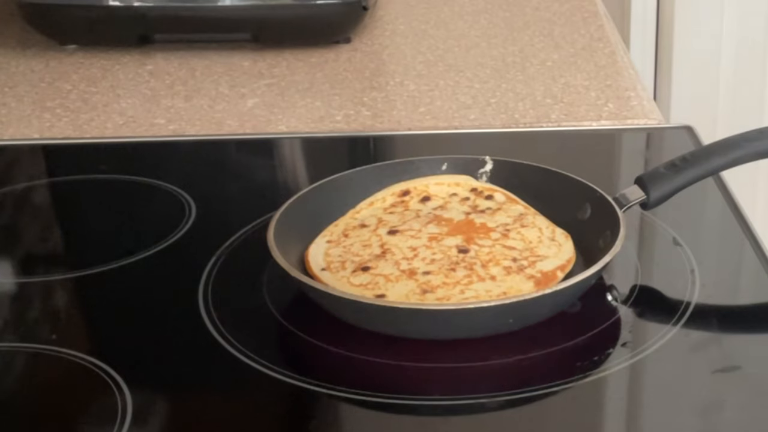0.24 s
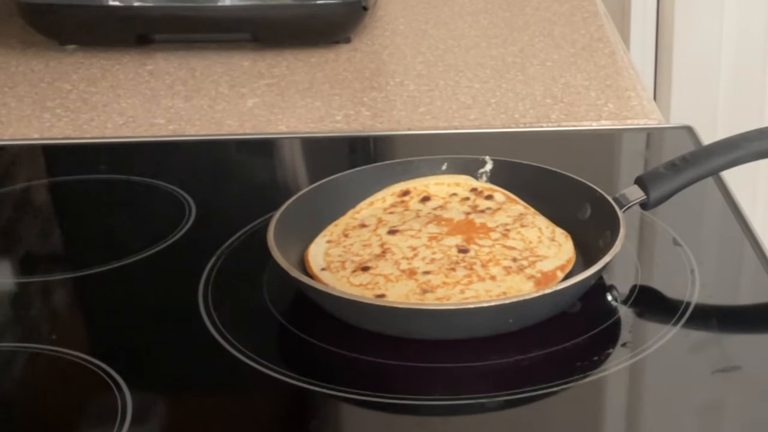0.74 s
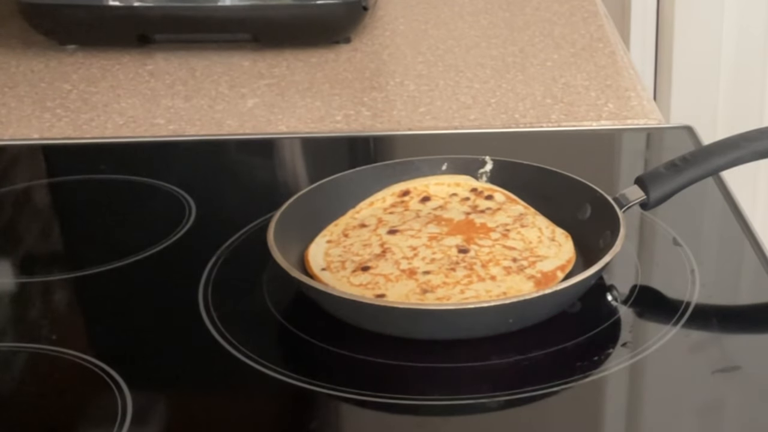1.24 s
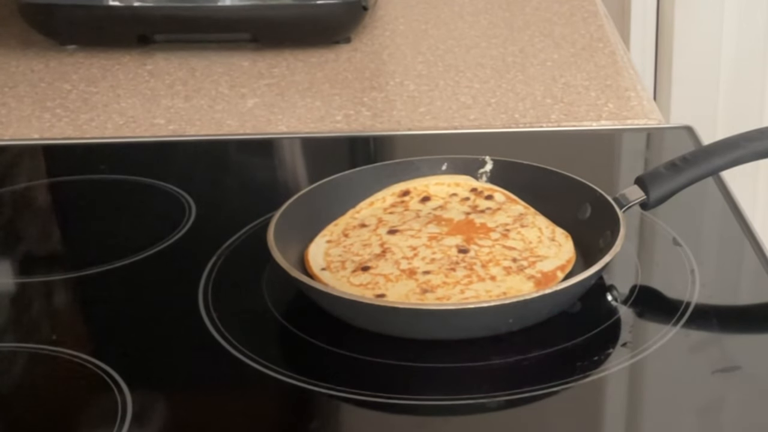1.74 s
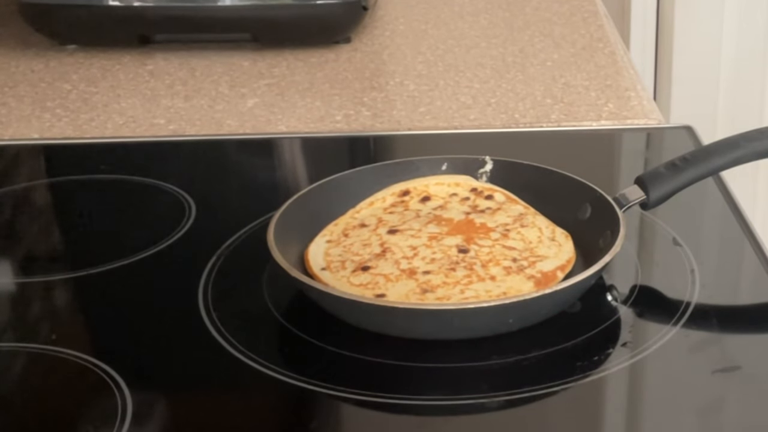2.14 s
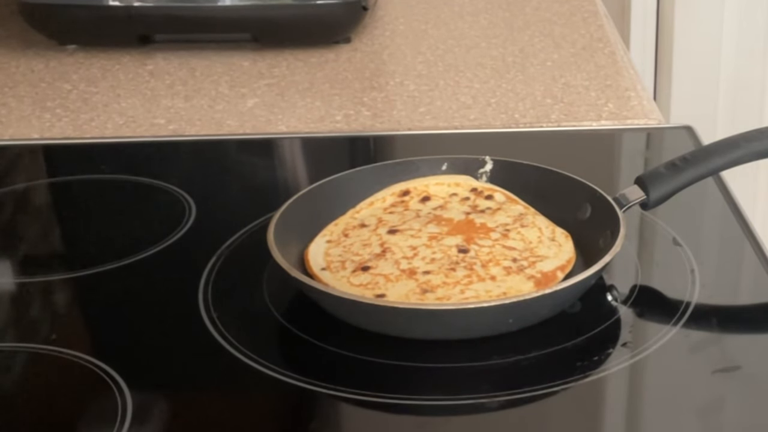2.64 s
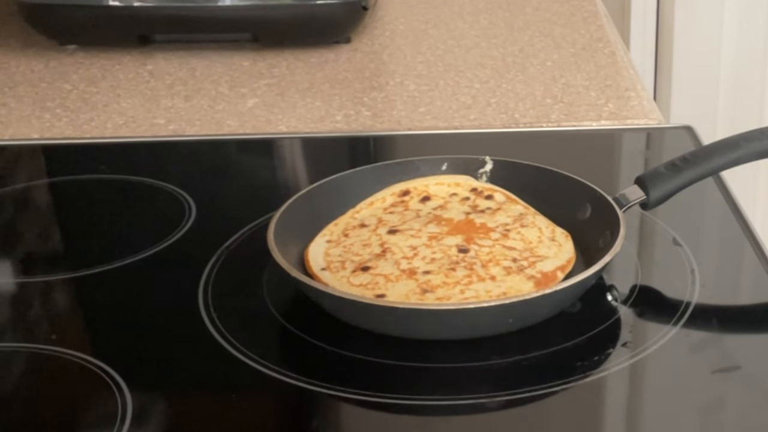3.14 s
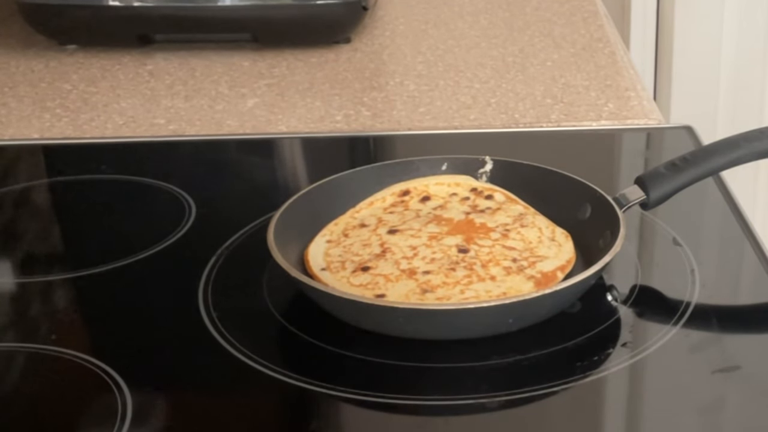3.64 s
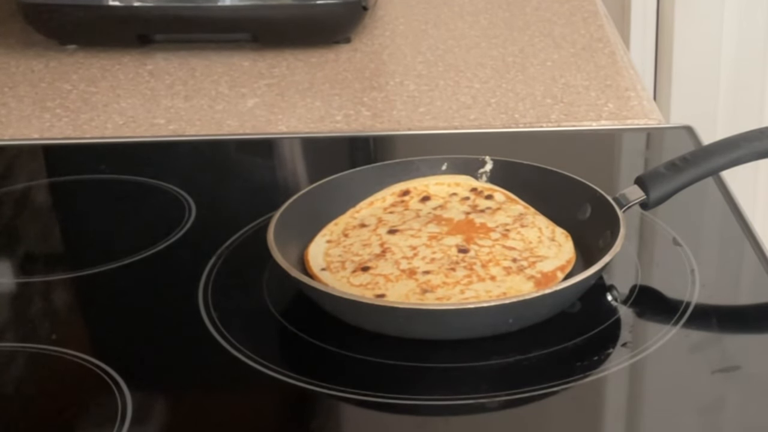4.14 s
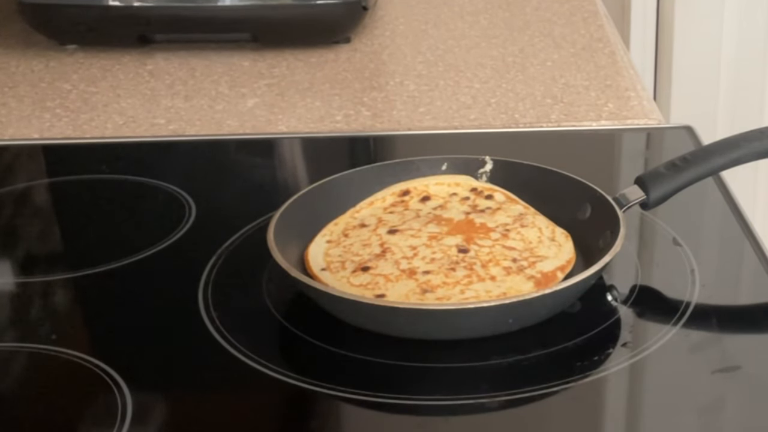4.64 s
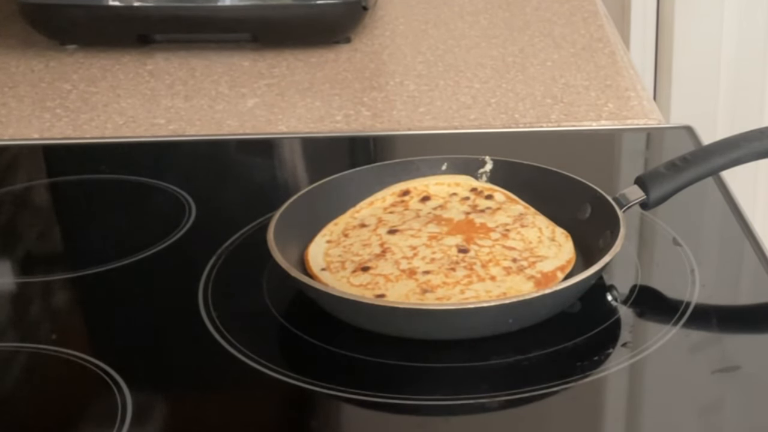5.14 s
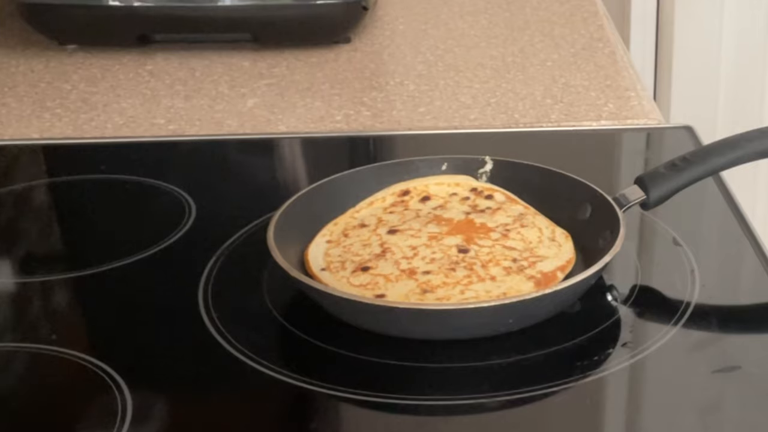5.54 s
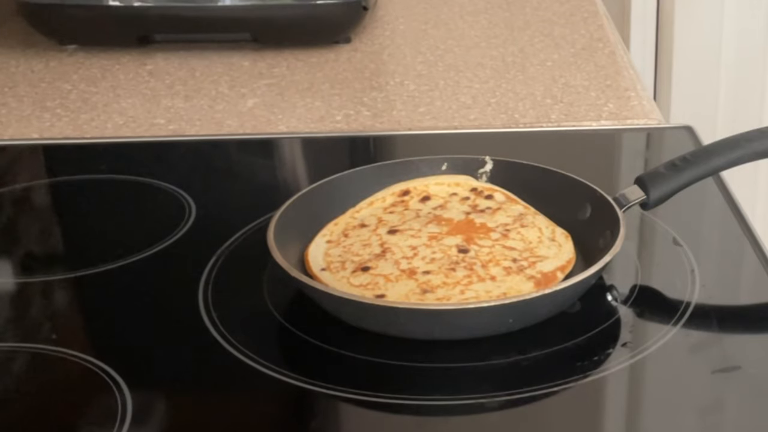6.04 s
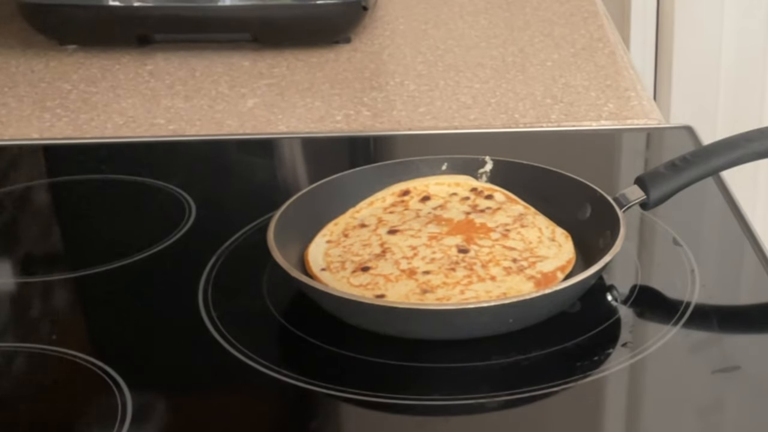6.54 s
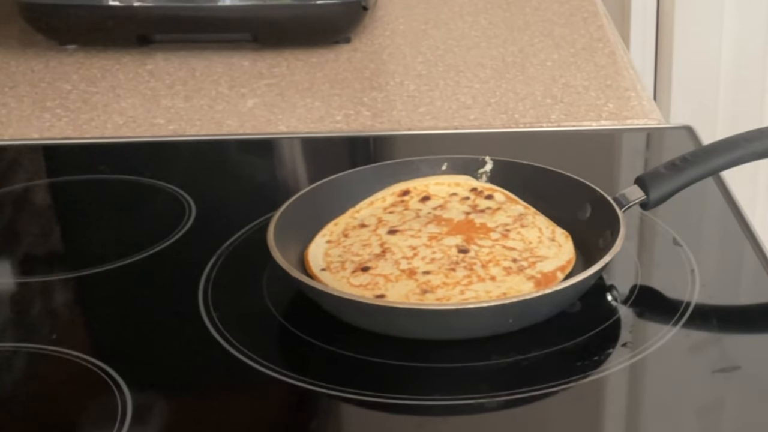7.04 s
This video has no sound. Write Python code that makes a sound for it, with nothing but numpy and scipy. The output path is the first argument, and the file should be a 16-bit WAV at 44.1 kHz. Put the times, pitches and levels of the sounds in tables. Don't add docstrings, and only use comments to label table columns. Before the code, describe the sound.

Off to one side in a kitchen, drawers scrape and knock, utensils clatter, and a cupboard slams hard over faint appliance hum.

```python
import sys
import numpy as np
from scipy import signal
from scipy.fft import rfft, irfft, next_fast_len
from scipy.io import wavfile
from scipy.ndimage import uniform_filter1d

SR = 44100
rng = np.random.default_rng(int(sys.argv[2]) if len(sys.argv) > 2 else 0)


def bounce(signal):
    frames = np.transpose(np.atleast_2d(signal))
    limited = np.clip(frames, -1, 1)
    pcm = np.round(limited * 32767).astype(np.int16)
    wavfile.write(sys.argv[1], SR, pcm)


def magnitude_from_level(level_db):
    exponent = np.asarray(level_db, float) / 20
    return 10 ** exponent


N = 321797

# frequency in Hz, density in dB per Hz.
HUSH_SPECTRUM = [(30, -2), (55, -8.5), (85, -4), (120, 6), (170, -16), (240, -13.5), (340, -10.5),
                 (700, -18.5), (1300, -26), (2500, -30.5), (5000, -37.5), (8000, -34.5), (11000, -36.5),
                 (15500, -46)]
HUSH_DB = -53.5
# times in seconds, gain of the air above 6 kHz in dB.
TREBLE_AIR = [.8, 2.4, 4, 8], [3, 1.8, -6.5, -3.5]
# frequency in Hz, likeness from 0 to 1.
PORT_LIKENESS = [(60, .96), (170, .6), (500, .15), (900, .2), (6300, .3), (7300, .7), (8000, .99),
                 (16000, 1)]
# frequency in Hz, T60 in seconds.
ROOM_T60 = [(60, 0.73), (250, 0.61), (1000, 0.56), (4000, 0.53), (8000, 0.49), (12000, 0.55)]
# frequency in Hz, level in dB.
ROOM_COLOUR = [(150, 9), (230, -10), (340, 4.5), (500, -1.5), (700, 1), (1000, -4), (1280, 0), (1600, 0),
               (2200, 0.5), (2750, 1), (3300, -2), (5000, 2), (7500, -3), (11000, -2.5), (15000, -22)]
PORT_LAG = 10.79
BASS_LAG = 12
RING_TURN = 1.4

# start in seconds, level in dB, deep boom in dB relative to the panel.
SIDE_WALL = (107, 0.33), [(.562, -44, -15), (.69, -42, -8), (.901, -46.5, -7), (1.161, -35, -8.5),
             (1.562, -26.5, -24.5), (1.598, -25, -10), (1.861, -21.5, -7.5), (3.234, -50, -15),
             (4.015, -46.5, -31), (4.323, -36, -16), (4.691, -41, -11), (7.174, -30, 4),
             (7.249, -17.5, -16)]
FRONT = (109, 0.23), [(5.455, -38, -13), (6.243, -44, -3), (6.689, -36, -8), (6.92, -39.5, -13),
         (6.954, -38, -3.5), (7.119, -34.5, -5), (7.217, -11.5, -2), (7.275, -21.5, -5.5)]
BOTTOM = (109, 0.24), [(1.04, -22, -20), (1.056, -23, -20), (.399, -44.5, -9), (2.899, -40, -21),
          (4.502, -47, -23), (5.231, -63, -20), (5.387, -46, -26.5), (5.827, -47, -16)]
SHELF = (142, 0.44), [(.009, -35.5, -0.5), (.098, -45, -12), (6.645, -44, -2)]
FLOOR = (78, 0.5), [(1.866, -27.5, -5), (2.3, -57, 6.5)]

PARTS_HZ = [850, 300, 2600, 6500, 12500]
# loudest moment in seconds, level in dB, swell in seconds, fade in seconds, hardness from 0 to 1.
DRAGS = [(0.043, -21, 0.1, 0.11, 0.45), (.382, -46.5, 0.087, 0.026, 0.5), (.8, -65, .02, 0.11, 0.8),
         (.62, -54, 0.11, 0.099, .1), (.85, -66, 0.076, 0.13, 0), (4.93, -45.5, 0.22, 0.068, 0.4),
         (.6, -64, 0.056, 0.61, 0.6), (1.0, -49, 0.84, 0.022, 0.71), (1.027, -26, 0.014, 0.0058, 0.52),
         (1.551, -39.5, 0.01, 0.11, 0.99), (1.612, -35.5, 0.33, 0.67, 0.61),
         (1.76, -45.5, 0.24, 0.052, 0.93), (1.851, -28.5, 0.034, 0.01, 0.2),
         (2.888, -35, 0.043, 0.094, 0.72), (3.27, -48.5, 0.49, 0.4, 0.8), (4.05, -53, 0.52, 0.045, 0.72),
         (2.25, -72.5, 0.18, 0.61, 0.94), (4.399, -53.5, 0.42, 0.058, 0.85),
         (4.47, -32, 0.044, 0.029, 0.86), (4.654, -38.5, 0.075, 0.015, 1), (5.37, -42.5, 0.041, 0.19, 0),
         (5.5, -49, 0.074, 0.23, 1), (5.9, -49.5, 0.29, 0.73, 0.67), (6.239, -40.5, 0.52, 0.2, 0.88),
         (6.64, -58, .15, 0.42, 0.1), (6.942, -44, 0.074, 0.2, 0.8), (7.0, -36.5, 0.17, 0.29, 0.73),
         (7.22, -37, 0.053, 0.014, 1)]
SWELL_DB = 20
# carcass, clack and tick in dB relative to the knock.
SOFT_DB = (-5, -36.5, -39)
HARD_DB = (-10.5, 5, -2)
# start in seconds, knock level in dB, contact in milliseconds.
THUDS = (4.6, -16, -18.5), [(1.558, -38, 20), (1.603, -30, 4.1), (2.887, -49.5, 12), (3.439, -57, 9.4),
         (3.551, -55.5, 13), (5.214, -60, 12), (5.351, -59.5, 8), (6.585, -51.5, 28), (6.62, -47, 54),
         (6.66, -50.5, 28), (7.131, -37, 97), (7.212, -28, 16)]
RAPS = (-7.5, -12.5, -40), [(1.48, -34, 45), (3.355, -43, 8.3), (3.713, -48, 41), (4.046, -49.5, 9),
        (4.199, -44.5, 20), (4.69, -44, 41), (5.458, -38.5, 11), (6.089, -34.5, 15), (6.155, -36.5, 8.8),
        (6.177, -37, 13), (6.216, -33.5, 18), (6.25, -37.5, 31), (6.3, -42, 19), (6.826, -61.5, 11),
        (6.927, -37, 3.7)]
CLACKS = (-10, -8.5, -19.5), [(1.186, -35, 10), (1.196, -26.5, 25), (3.222, -45, 6), (3.236, -35, 25),
          (4.489, -30, 19), (5.42, -37, 23), (5.649, -46.5, 25), (5.901, -28.5, 14.8), (5.94, -43.5, 8.9),
          (6.893, -42.5, 18), (6.959, -52, 7.8)]
TICKS = (1.05, -2.6, -7), [(.36, -51, 33), (1.032, -37.5, 11.5), (2.46, -51.5, 3.7), (2.8, -52, 8.9),
         (3.1, -59.5, 11), (3.842, -57.5, 6), (3.988, -48.5, 27), (4.302, -43.5, 29), (4.402, -36.5, 14),
         (5.511, -48, 19)]
CRASHES = (-1.2, -3, -27), [(1.862, -17, 24.14)]
CHINKS = (-14.5, 1.3, -2.8), [(2.8, -52.5, 15), (4.477, -54.5, 9.1), (4.652, -24, 36), (4.593, -50, 8.7),
          (4.628, -54, 6.9), (5.162, -68, 4.8), (5.52, -50.5, 28), (6.958, -36.5, 13), (7.2, -29.5, 26)]

# mode frequency in Hz, level in dB, T60 in seconds.
DOOR = [(258.7, -0.5, 0.44), (323, -6.5, 0.22), (406, -4, 0.34), (482, 9, 0.066), (765, -11, 0.15),
        (842, -8.5, 0.19), (1058, 13, 0.12), (1097, 1, 0.25), (1143, -7.5, 0.31), (1387, -3.5, .3),
        (1533, -8, 0.25), (2156, -18.5, 0.34), (3220, -17.5, .25), (3730, -19.5, .3)]
HINGE = [(2050, -4, .15), (4480, -2, .2), (6070, -5, .2), (6200, -6, .15), (7850, -5, .25), (8050, -6, .15),
         (9700, -2, .1), (10100, -3, .1), (10810, -4, .2), (11140, -8, .2), (12100, -7, .15),
         (12400, -7, .2)]
LATCH = [(3280, -0.5, 0.017), (3888, -4, 0.044), (4290, -2.5, 0.025), (5490, -8, .03), (4815, -2.5, 0.013),
         (4550, 2.5, 0.039)]
LINER = [(318, 0, 0.115), (394.5, -1.5, .12), (470, -5, 0.08)]
BOX = [(415, -3.5, .05), (545, -2, .06), (850, 0.5, .08), (996, -3.5, .06), (1420, -12.5, 0.052)]
TRAY = [(499, -6, 0.011), (671, 0, 0.015), (769.4, -5.5, 0.056)]
LADLE = [(1384, -18, .35), (2098, -17, .35), (2142, -11, .3), (2186, 0, .36), (2200, -8, .75),
         (2649, -17, .65), (3262, -25, .35), (4490, -26, .4), (4727, -18, .65), (5744, -22, .3),
         (8118, -24, .2), (8430, -15, .15), (11440, -26, .2), (12180, -25, .2)]
TONGS = [(1227, 8, 0.14), (1910, -1, 0.37), (3340, -5.5, 0.24), (5560, -5, .12), (8540, -17, .2)]
SPOON = [(960, -2.5, .25), (1340, -6, .25), (2190, 0, .3), (2720, -7, .55), (3400, -9, .2),
         (4910, -18, .12)]
FORK = [(3330, 0, .15), (3345, -7, .6), (3420, -8, .2), (5620, -12, .15)]
GLASS = [(3235, 12, 3.5), (8200, 8, .3), (8850, 3, .12)]
CUP = [(490, -5.5, 0.11), (529, 1.5, 0.1), (798, 1.5, 0.063), (1423, -9, 0.54), (1796, 4.5, 0.26),
       (2500, -14, 0.31), (2830, -27, 0.32), (3080, -26, .25), (4240, -24, 0.32), (7477, -47.5, 0.18),
       (9560, -24, .15)]
PAN = [(511, 10.5, 0.038), (636, -4, 0.037), (1720, -9, .08), (1990, -3.5, 0.11), (2880, -12.5, 0.073),
       (3079, -4.5, .07), (4300, -16, 0.051), (5160, -31, 0.15), (7800, -19.5, .08)]
SCOOP = [(2600, -6, .05), (3690, -6, .1), (3775, -6, .12), (3854, 2, .5), (6072, -14, .3), (9469, -16, .2),
         (9800, -16, .1), (10500, -15, .12)]
CUTLERY = [(1755, -0.5, 0.8), (2220, -10, 0.39), (2850, -11, 0.4), (3600, -6, 0.16), (3890, 1, 0.21),
           (4760, 0, 0.26), (4910, -3.5, .25), (5970, 1, 0.27), (7340, -6, 0.17), (7580, -1, 0.2),
           (8030, -5.5, .25), (8300, -7, .3), (9580, -7, 0.33), (11740, -8, 0.24)]
WHISK = [(2330, 0, .3), (3600, -12, .06), (5600, -8, .05), (13700, -8, .15)]
KEYS = [(10900, -3.5, 0.09), (11650, -5, 0.1), (12760, -1.5, .1), (13050, -3, .08), (13300, 2.5, 0.13),
        (13480, -0.5, .1), (13650, -1.5, .15), (14460, 1.5, .1), (14150, -1.5, .1), (14300, -4.5, .1),
        (15640, -5, .08), (15210, -4.5, 0.1205), (15600, -6, .08)]
# start in seconds, level in dB, contact in milliseconds.
HITS = [(LINER, [(.57, -51, 30), (.79, -49.5, 30), (.88, -51, 35), (.95, -49, 25), (7.212, -26, 13.5)]),
        ([(193.7, -0.5, .16), (150.2, -4.5, .1)], [(1.864, -23, 6), (6.64, -39, 25)]), ([(525, 4, .07),
        (613, -2.5, .07)], [(1.57, -38.5, 25), (1.61, -34, 12)]), (BOX, [(5.903, -34, 4.8),
        (5.938, -43.5, 4.5), (6.091, -34, 4), (4.8, -41, 4.5), (6.609, -46.5, 4.5), (5.455, -43, 6),
        (1.8605, -23.5, .8)]), (GLASS, [(.0, -65.5, 1)]), (HINGE, [(1.69, -44.5, 24.9)]),
        (DOOR, [(1.86, -18.5, 1.8)]), (LATCH, [(1.848, -36.5, 8.5), (1.859, -18, 0.92)]), ([(3900, -1, .04),
        (4160, -1, .04), (4620, -5, .04)], [(3.098, -57.5, 20)]), ([(1070, 7.5, .3), (796, 2.8, 0.27)],
        [(0., -38.5, 12)]), (FORK, [(1.189, -40.5, 3.3), (1.47, -60, 26), (6.36, -60.5, 60),
        (6.45, -62, 60), (7.022, -44, 6.9)]), (TONGS, [(6.2, -46, 25)]), (CUTLERY, [(2.803, -53, 14),
        (2.905, -73, 10), (3.1, -64, 8.2), (3.236, -53, 3.7)]), (PAN, [(4.408, -34, 15), (4.455, -41, 13)]),
        (CUP, [(4.486, -28, 4.6), (4.611, -65, 5.7)]), (KEYS, [(4.472, -48, 26), (4.65, -56, 16),
        (5.512, -54, 22), (1.7, -66, 40), (2.803, -61, 15), (6.955, -58, 20)]), (SCOOP, [(4.65, -30, 1.7)]),
        (LADLE, [(4.665, -19, 3.1)]), (WHISK, [(5.545, -56, 20), (5.6, -55, 33)]),
        (SPOON, [(6.478, -56, 22), (6.53, -66.5, 13)]), ([(263, 1, 0.14), (326.6, -2, 0.096)],
        [(7.216, -19, 7.2)])]
# start in seconds, level in dB, contact in milliseconds.
TRAY_HITS = [(2.815, -39, 42), (2.875, -36.5, 45), (3.09, -47.5, 37), (3.24, -69, 24), (3.345, -32.5, 17),
             (3.44, -44.5, 7.7), (3.55, -42, 6.5), (3.84, -48.5, 12), (4.035, -36.5, 29), (4.195, -35, 20),
             (4.685, -23, 21), (4.785, -31, 24), (5.902, -55, 5.7), (6.09, -42, 14), (7.055, -41.5, 25),
             (6.925, -40, 11), (1.68, -33, 25), (4.9, -43, 22), (3.19, -50, 22), (3.62, -52.5, 27)]
# start in seconds, level in dB, contact in milliseconds.
GLINTS = [(1.7, -52, 25), (1.859, -38, 5), (2.803, -56.5, 15), (4.472, -38, 25), (4.648, -42, 20),
          (5.512, -53, 22), (6.955, -57, 15), (7.2, -52.5, 20)]
# start in seconds, level in dB, top of the blow in Hz.
SLAMS = [
    (-.025, 12, 1747),
    (1.8598, 22.5, 1624),
]


def on_log(table, hz):
    table = np.array(table)
    return np.interp(np.log(hz + 1), np.log(table[:, 0]), table[:, 1])


def unit(x):
    return x / np.sqrt(np.mean(x ** 2))


def band(x, lo_hz, hi_hz, order=2):
    return signal.sosfilt(signal.butter(order, [lo_hz, hi_hz], "band", fs=SR, output="sos"), x)


def add(track, s, x):
    i = int(s * SR)
    track[..., i:i + x.shape[-1]] += x[..., :N - i]


def walk(rate):
    k = int(SR / rate)
    steps = np.repeat(rng.standard_normal(N // k + 1), k)
    return 3.4 * uniform_filter1d(uniform_filter1d(steps, k), k)[:N]


def pair(size):
    mid, side = rfft(rng.standard_normal((2, size)))
    likeness = np.clip(on_log(PORT_LIKENESS, np.linspace(0, SR / 2, len(mid))), 0, 1)
    shared = mid * np.sqrt(1 + likeness)
    apart = side * np.sqrt(1 - likeness)
    return irfft(shared + np.array([[1], [-1]]) * apart, size) / np.sqrt(2)


def push(ms):
    t = np.arange(4096) / SR / (max(ms, .3) / 1000)
    return (1 - np.exp(-t / 0.25)) * np.exp(-t)


def hush():
    size = next_fast_len(N)
    hz = np.linspace(0, SR / 2, size // 2 + 1)
    spec = rfft(pair(size)) * magnitude_from_level(on_log(HUSH_SPECTRUM, hz))
    out, swell = 0, walk(2.5)
    for centre in np.arange(4.5, 14.5, 1):
        share = np.clip(1 - abs(np.log2(hz + 1) - centre), 0, 1)
        out = out + irfft(spec * share, size)[:, :N] * magnitude_from_level(.4 * swell + 1.1 * walk(8))
    hiss_gain = magnitude_from_level(np.interp(np.arange(N) / SR, *TREBLE_AIR)) - 1
    hiss = irfft(spec * (hz > 6000), size)[:, :N] * hiss_gain
    return unit(out + hiss) * magnitude_from_level(HUSH_DB)


def room(early_db=-6, early_t60=0.034):
    t = np.arange(SR * 3 // 4) / SR
    noise = pair(len(t))
    tail = 0
    for hz in 59.5 * 2 ** np.arange(9):
        t60 = on_log(ROOM_T60, hz)
        octave = band(noise, hz / np.sqrt(2), min(hz * np.sqrt(2), 20000))
        tail = tail + octave * 1000 ** (-t / t60) / np.sqrt(t60)
    early = pair(len(t)) * 1000 ** (-t / early_t60)
    spec = rfft(tail / np.linalg.norm(tail[0]) + magnitude_from_level(early_db) * early / np.linalg.norm(early[0]))
    total, k = np.cumsum(abs(spec) ** 2, axis=1), np.arange(spec.shape[1])
    lo = (k * .9).astype(int)
    hi = np.minimum((k * 1.1).astype(int) + 8, k[-1])
    broad = (total[:, hi] - total[:, lo]) / np.maximum(hi - lo, 1) + 1e-9
    colour = magnitude_from_level(on_log(ROOM_COLOUR, k * SR / len(t)))
    return irfft(spec / np.sqrt(broad) * colour, len(t))[:, :len(t) * 7 // 8]


def thumps():
    out, t = np.zeros(N), np.arange(SR // 2) / SR
    for (hz, t60), shakes in (SIDE_WALL, FRONT, BOTTOM, SHELF, FLOOR):
        swing = (1 - np.exp(-t / 0.0044)) * 1000 ** (-t / max(t60, .03))
        glide = 1 + 0.028 * np.exp(-t / 0.082)
        panel = swing * np.sin(2 * np.pi * hz * t * glide)
        for (s, db, boom_db), (deep, turn) in zip(shakes, rng.random((len(shakes), 2))):
            roll = (1 - np.exp(-t / 0.049)) * 1000 ** (-t / 0.66)
            boom = roll * np.sin(2 * np.pi * ((45 + 15 * deep) * t + turn))
            add(out, s, magnitude_from_level(db + 5.5) * (panel + magnitude_from_level(boom_db) * boom))
    return out


def voiced(force):
    size = next_fast_len(N)
    octave = np.log2(np.linspace(1, SR / 2, size // 2 + 1))
    knots = np.log2([165, *sorted(PARTS_HZ), 40000])
    out = 0
    for f, hz in zip([*force, magnitude_from_level(-4.5) * force[3]], PARTS_HZ):
        share = np.interp(octave, knots, knots == np.log2(hz)) * magnitude_from_level(-3 * octave)
        noise = irfft(rfft(rng.standard_normal(size)) * share, size)[:N]
        out = out + f * unit(noise)
    return out


def rummage():
    force = np.zeros((4, N))
    for s, db, swell, fade, hard in DRAGS:
        start = max(s - 3 * swell, 0)
        t = np.arange(start - s, 3 * fade, 1 / SR)
        away = np.where(t < 0, -t / max(swell, .003), t / max(fade, .003))
        colour_db = np.add(SOFT_DB, hard * np.subtract(HARD_DB, SOFT_DB))
        rel_db = np.array([0, *colour_db])
        add(force, start, magnitude_from_level(rel_db)[:, None] * magnitude_from_level(db - 7.5 - SWELL_DB * away))
    slips = (rng.random(N) < 900 / SR) * magnitude_from_level(2.5 * np.minimum(rng.exponential(size=N), 2.5))
    grain = unit(uniform_filter1d(signal.lfilter([1], [1, -.99], slips), size=60) + 0.083)
    return voiced(force * grain * magnitude_from_level(0.52 * walk(25)))


def knocks():
    force = np.zeros((4, N))
    for rel_db, blows in (THUDS, RAPS, CLACKS, TICKS, CRASHES, CHINKS):
        for s, db, ms in blows:
            level = magnitude_from_level(db + 2.5 + np.array([0, *rel_db]))[:, None]
            add(force, s, level * push(ms) / np.sqrt(max(ms, .3) / 12))
    return voiced(force)


def ring(modes, ms, rattle_db=4):
    size = int(SR * min(1, .2 + max(m[2] for m in modes)))
    t, force = np.arange(size) / SR, push(ms)
    force = np.pad(force, (0, size - len(force)))
    hold = SR // 100
    out = 0
    for (hz, db, t60), turn in zip(modes, rng.random(len(modes))):
        swell = signal.lfilter([1], [1, -1000 ** (-1 / (max(t60, .01) * SR))], force)
        steps = np.repeat(rng.standard_normal((2, 101)), hold, axis=1)
        waver = uniform_filter1d(steps, hold)[:, :size] * min(1, .3 / t60)
        tone = np.sin(2 * np.pi * (hz * t + turn) + 1.21 * waver[1])
        out = out + magnitude_from_level(db + rattle_db * waver[0]) * swell / swell.max() * tone
    return out


def utensils():
    out, glitter = np.zeros(N), np.zeros(N)
    for modes, strikes in [*HITS, (TRAY, TRAY_HITS)]:
        for s, db, ms in strikes:
            add(out, s, magnitude_from_level(db) * ring(modes, ms))
    for s, db, ms in GLINTS:
        add(glitter, s, magnitude_from_level(db) * push(ms))
    return out + glitter * unit(band(rng.standard_normal(N), 13000, 15900, order=4))


def slams(echo):
    out = np.zeros((2, N))
    for s, db, top_hz in SLAMS:
        blow = band(echo, 250, top_hz, order=1)
        missed = int(max(-s, 0) * SR)
        add(out, max(s, 0), magnitude_from_level(db) * blow[:, missed:])
    return out


def scene():
    echo, air = room(), hush()
    contact = magnitude_from_level(3) * knocks() + rummage()
    low, steel = thumps(), utensils()
    wet = signal.fftconvolve((contact + magnitude_from_level(-7) * steel)[None], echo, axes=1)[:, :N]
    near = wet + slams(echo) + [np.roll(low, BASS_LAG), 0.94 * low] + air
    size = next_fast_len(N + 64)
    late = np.exp(-2j * np.pi * np.arange(size // 2 + 1) * PORT_LAG / size)
    hz = np.linspace(0, SR / 2, len(late))
    held = np.where(hz < 7000, np.exp(-1j * RING_TURN), late)
    direct = steel * magnitude_from_level(-3)
    left = irfft(rfft(near[0], size) * late + rfft(direct, size) * held, size)[:N]
    return np.array([left, near[1] + direct])


def band_limit(x):
    return signal.sosfilt(signal.butter(12, 15960, fs=SR, output="sos"), x)


def record(dry):
    x = signal.sosfilt(signal.butter(4, 40, "high", fs=SR, output="sos"), dry)
    size = next_fast_len(N)
    hz = np.linspace(0, SR / 2, size // 2 + 1)
    turn = np.pi * hz * PORT_LAG / SR
    strength = abs(np.array([np.cos(turn), np.sin(turn)]))
    keep = np.clip((strength - .3) / .15, .02, 1)
    keep = np.where(hz > 7800, keep, 1) * (hz < np.array([[15800], [15250]]))
    mid, side = irfft(rfft([x[0] + x[1], x[0] - x[1]], size) * keep, size)[:, :N] / 2
    return band_limit(np.array([mid + side, mid - side]))


dry = scene()
out = record(dry)
bounce(out)
```